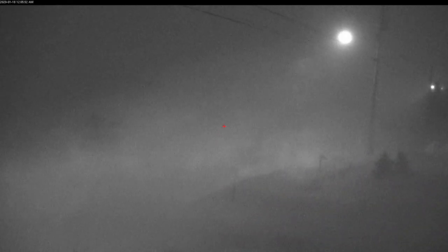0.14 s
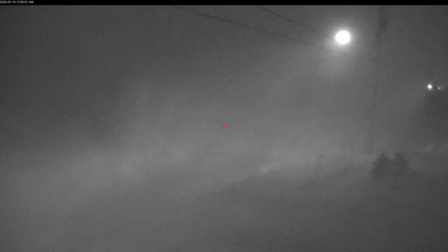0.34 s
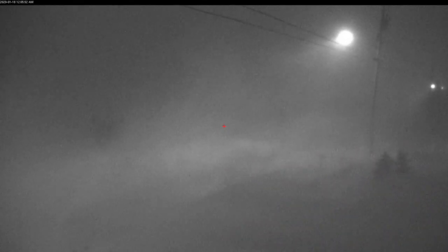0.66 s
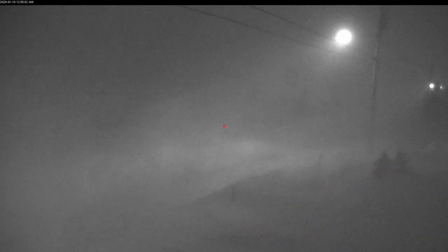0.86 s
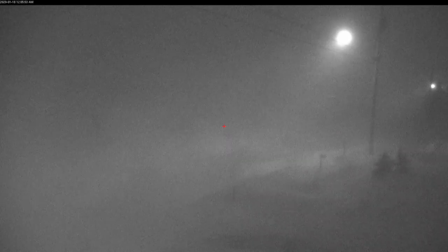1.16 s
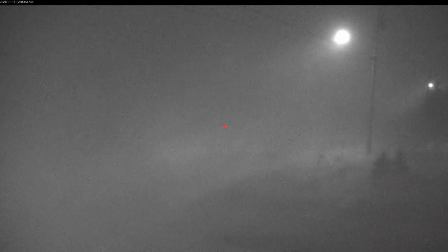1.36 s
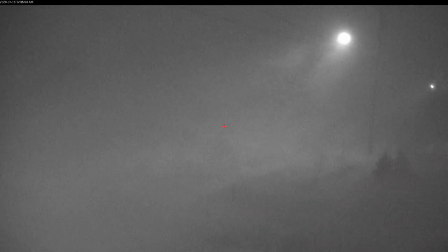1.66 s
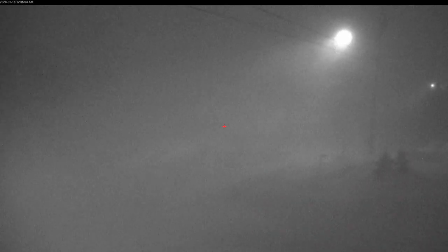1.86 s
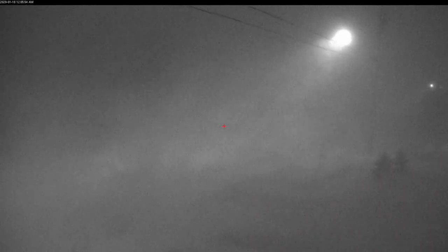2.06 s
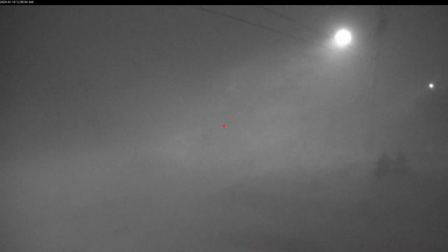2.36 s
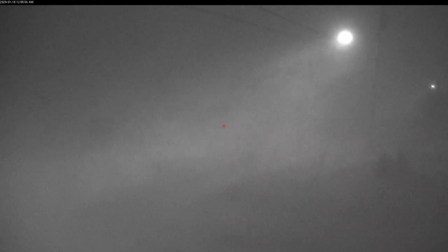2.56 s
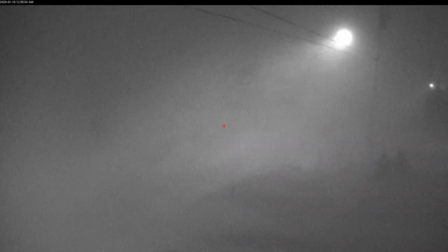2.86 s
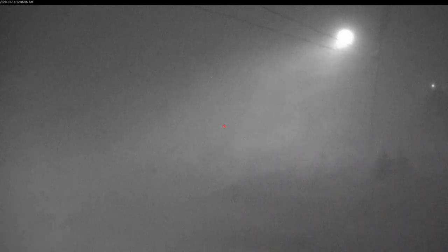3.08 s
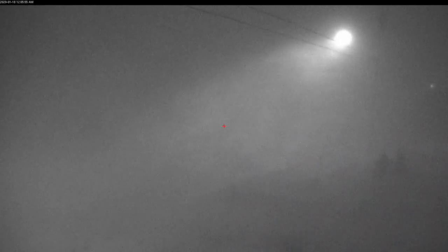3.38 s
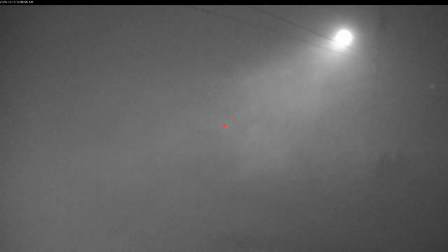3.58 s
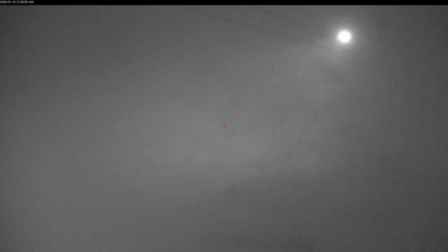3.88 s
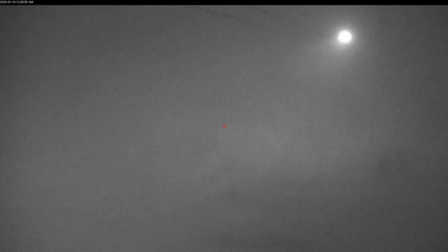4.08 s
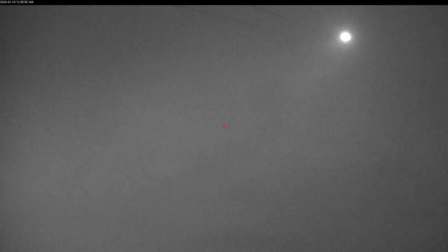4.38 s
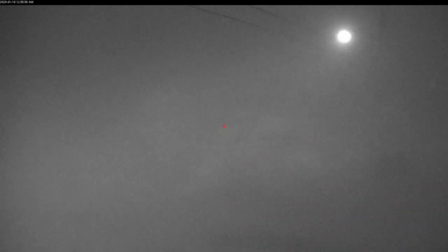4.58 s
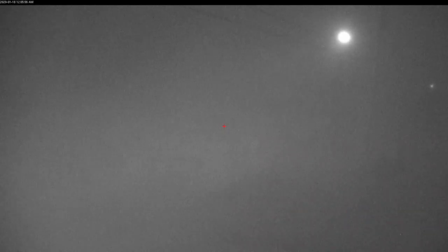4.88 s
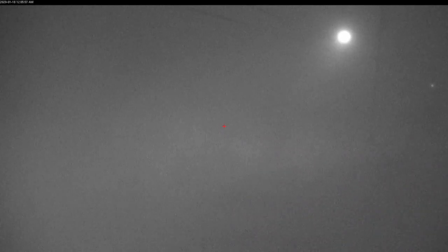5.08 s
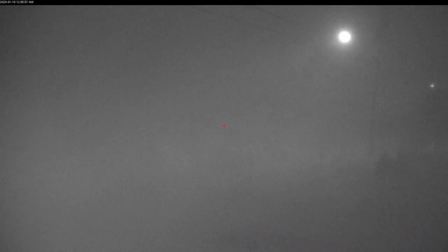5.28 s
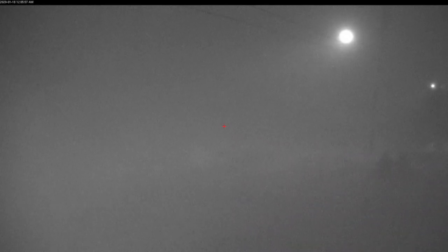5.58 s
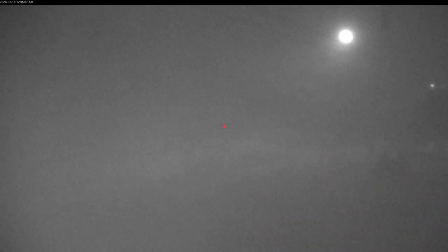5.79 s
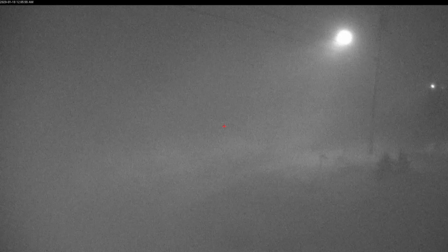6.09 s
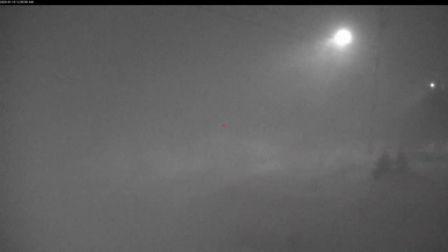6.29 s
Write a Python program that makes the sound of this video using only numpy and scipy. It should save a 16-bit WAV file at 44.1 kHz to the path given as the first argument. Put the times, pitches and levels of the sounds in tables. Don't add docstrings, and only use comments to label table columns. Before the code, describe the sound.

Close, nearly mono wind noise overloads a sheltered outdoor microphone with soft, heavy bass thumps. Panels drum and resonate in the low middle range as gusts shake them. Over this, fine snow sprays past in dry, flickering hisses, with scattered crisp ice clicks, tiny high pings and occasional loose rattles. The pellets grow more frequent in the second half, and the storm is still strengthening when it stops.

```python
import sys
import numpy as np
from scipy import signal
from scipy.fft import rfft, irfft, next_fast_len
from scipy.io import wavfile
from scipy.ndimage import uniform_filter1d

SR = 44100
rng = np.random.default_rng(int(sys.argv[2]) if len(sys.argv) > 2 else 0)


def makeup_ratio(level_db):
    decades = np.asarray(level_db, float) / 20
    return 10 ** decades


def wav_out(sig):
    wavfile.write(sys.argv[1], SR, np.round(np.clip(np.atleast_2d(sig).T, -1, 1) * 32767).astype(np.int16))


N = 284004
SIZE = next_fast_len(N + SR)
HZ = np.maximum(np.arange(SIZE // 2 + 1) * SR / SIZE, 0.1)


def unit(x):
    return x / np.sqrt(np.mean(x ** 2))


def band(x, lo_hz, hi_hz):
    return signal.sosfilt(signal.butter(2, [lo_hz, hi_hz], "band", fs=SR, output="sos"), x)


def walk(rate):
    hold = max(int(SR / rate), 1)
    steps = rng.standard_normal(4000)[np.arange(N) // hold % 4000]
    return unit(uniform_filter1d(uniform_filter1d(steps, hold), hold))


def swells(times, heights, lengths):
    out, t = np.zeros(N), np.arange(N) / SR
    for s, height, length in zip(times, heights, lengths):
        part = slice(max(int((s - 2 * length) * SR), 0), int((s + 2 * length) * SR))
        out[part] += height * 0.5 ** np.square(2 * (t[part] - s) / length)
    return out


# centre in Hz, width in Hz, lift in dB.
RESONANCES = [(56, 7.7, -6), (120, 20, 5), (166.4, 17, 7.5), (239.4, 8.6, 5.5), (284, 34, 5.5),
              (326.3, 25, 6.5), (412, 40.7, 11), (521.5, 11, 9.5), (638, 46, 2.5), (928, 45, 5),
              (1288, 24, -7.5), (1918, 61, 6.5), (3330, 114, 4), (5130, 300, 4), (12950, 840, 4)]


def housing_gain():
    lifts_db = [db / (1 + np.square(2 * (HZ - hz) / width)) for hz, width, db in RESONANCES]
    return makeup_ratio(sum(lifts_db))


def colour(x, points):
    hz, db = np.transpose(points)
    source_db = np.interp(np.log(HZ), np.log(hz), db, left=-200, right=-200)
    return rfft(x, SIZE) * makeup_ratio(source_db) * housing_gain()


def coloured_noise(points):
    return unit(irfft(colour(rng.standard_normal(N), points), SIZE)[:N])


def eddies(x, points, shared_db, flicker_db, rate):
    spectrum = colour(x, points)
    half_octave = 2 * np.log2(HZ)
    first, last = int(2 * np.log2(points[0][0])), int(2 * np.log2(points[-1][0])) + 1
    out = 0
    for centre in range(first, last + 1):
        share = np.cos(np.pi / 2 * np.clip(half_octave - centre, -1, 1)) ** 2
        out = out + makeup_ratio(shared_db + flicker_db * walk(rate)) * irfft(spectrum * share, SIZE)[:N]
    return unit(out)


def steady(x, smooth_s, share):
    envelope = np.abs(signal.hilbert(x, SIZE)[:N])
    swell = uniform_filter1d(envelope, int(smooth_s * SR)) + 0.074
    return unit(x / swell ** share)


# time in seconds, wind force in dB, snow load in dB.
STORM_COURSE = [(0.0, 0.5, 1.5), (0.9, -0.5, -1.5), (1.55, -2, -3), (2.2, 3.5, -5), (2.65, -0.5, -2),
                (3.1, 2, 4), (3.7, 1, -1), (4.4, 4.5, 5), (4.75, 3, 4), (5.3, 4, 3), (5.7, 5.5, 5.5),
                (6.1, 7.5, 5.5), (6.44, 7.5, 7)]


def storm():
    s, force_db, load_db = np.transpose(STORM_COURSE)
    t = np.arange(N) / SR
    return np.interp(t, s, force_db), np.interp(t, s, load_db)


# frequency in Hz, density in dB per Hz.
SURGE_COLOUR = [(1, -2.5), (3, 0.5), (6, 3.5), (8.5, -0.5), (12, 4.5), (19, -1), (23, -15.5), (27, -60),
                (40, -89)]
# time in seconds, peak in dB, length in seconds.
SURGE_EVENTS = [(0.002, -19.5, 0.056), (0.193, -16.5, 0.046), (0.284, -12, 0.035), (0.544, -26.5, 0.16),
                (0.697, -17, 0.098), (0.89, -15, 0.015), (1.16, -13.5, 0.24), (1.406, -21.5, 0.048),
                (1.506, -9, 0.045), (1.759, -11, 0.08), (1.904, -18.5, 0.064), (2.137, -14, 0.16),
                (2.455, -7, 0.23), (2.73, -2.5, 0.052), (2.82, -15, 0.11), (2.98, -18, 0.098),
                (3.116, -17.5, 0.19), (3.311, -11.5, 0.068), (3.55, -15, 0.17), (3.977, -10.5, 0.044),
                (4.23, -9.5, 0.052), (4.536, -10, 0.13), (4.722, -18, 0.12), (4.852, -10, 0.087),
                (5.076, -13, 0.18), (5.268, -9.5, 0.069), (5.489, -14.5, 0.043), (5.643, -7.5, 0.048),
                (5.923, -13, 0.39), (6.288, -6.5, 0.19)]


def surges(force_db):
    lull_db, surge_top_hz = -26, 29.5
    s, peak_db, length = np.transpose(SURGE_EVENTS)
    gain = makeup_ratio(lull_db + force_db) + swells(s, makeup_ratio(peak_db), length)
    surge = gain * steady(coloured_noise(SURGE_COLOUR), smooth_s=0.053, share=0.75)
    return signal.sosfiltfilt(signal.butter(2, surge_top_hz, fs=SR, output="sos"), surge)


# frequency in Hz, density in dB per Hz.
BUFFET_COLOUR = [(16, -70), (24, -6), (32, -1), (44, -4.5), (60, -7), (68, -14.5), (78, -25.5), (100, -61)]
# time in seconds, peak in dB, length in seconds.
BUFFET_EVENTS = [(0.011, -23, 0.032), (0.14, -43, 0.037), (0.24, -45, 0.021), (0.34, -37, 0.063),
                 (0.39, -37.0, 0.026), (0.517, -44, 0.066), (0.702, -31, 0.062), (0.787, -46, 0.05),
                 (0.985, -37, 0.057), (1.118, -27, 0.054), (1.26, -35, 0.11), (1.437, -36, 0.18),
                 (1.547, -43, 0.021), (1.592, -33.5, 0.03), (1.73, -37, 0.082), (1.863, -31, 0.065),
                 (2.008, -32, 0.065), (2.135, -31.5, 0.083), (2.317, -26, 0.048), (2.35, -28, 0.038),
                 (2.46, -36, 0.036), (2.556, -28.5, 0.072), (2.622, -30, 0.026), (2.8, -30, 0.12),
                 (2.932, -29, 0.057), (3.006, -44, 0.041), (3.09, -32, 0.037), (3.166, -32, 0.043),
                 (3.327, -36, 0.027), (3.389, -36, 0.096), (3.47, -25, 0.022), (3.52, -30.0, 0.049),
                 (3.635, -36, 0.052), (3.726, -34, 0.047), (3.785, -36, 0.026), (3.87, -26.5, 0.057),
                 (4.035, -27, 0.12), (4.127, -28, 0.023), (4.25, -23, 0.029), (4.324, -33, 0.037),
                 (4.39, -30.0, 0.061), (4.625, -38, 0.052), (4.712, -29, 0.03), (4.802, -19.5, 0.055),
                 (4.917, -23, 0.025), (5.035, -23, 0.041), (5.102, -27, 0.078), (5.213, -31, 0.15),
                 (5.383, -30, 0.14), (5.47, -33, 0.032), (5.6, -25, 0.033), (5.617, -33, 0.078),
                 (5.743, -36, 0.023), (5.838, -31, 0.047), (5.983, -29, 0.12), (6.137, -30, 0.043),
                 (6.28, -30, 0.076), (6.375, -34, 0.046)]


def buffeting(force_db):
    lull_db, damping_db = -36.5, -2
    s, peak_db, length = np.transpose(BUFFET_EVENTS)
    gain = makeup_ratio(lull_db + force_db) + swells(s, makeup_ratio(peak_db), length)
    return makeup_ratio(damping_db) * gain * steady(coloured_noise(BUFFET_COLOUR), smooth_s=0.048, share=0.77)


# frequency in Hz, density in dB per Hz.
ROAR_COLOUR = [(50, -56), (70, -15), (100, 1), (200, -6.5), (320, -9), (430, -15.5), (490, -22.5),
               (620, -34.5)]
# time in seconds, lift in dB, length in seconds.
LARGE_PANEL_THUDS = [(0.155, -4, 0.033), (0.197, -5, 0.03), (0.254, -1, 0.03), (0.35, 3, 0.049),
                     (0.598, 3.5, 0.066), (0.788, 3, 0.047), (0.877, 5, 0.027), (0.945, 0.5, 0.14),
                     (1.098, 3, 0.026), (1.15, 9.0, 0.14), (1.285, 6, 0.044), (1.404, -2.5, 0.047),
                     (1.504, 5.5, 0.074), (1.656, 3.5, 0.037), (1.744, 4.5, 0.066), (1.898, 4.5, 0.071),
                     (2.036, 7.5, 0.071), (2.16, 8, 0.043), (2.227, 4.5, 0.039), (2.33, 9, 0.032),
                     (2.527, 9.5, 0.13), (2.754, 6, 0.03), (2.81, 9, 0.028), (2.866, 1, 0.04),
                     (2.947, 5, 0.075), (3.018, 4, 0.033), (3.102, 5, 0.033), (3.24, 5.5, 0.065),
                     (3.348, 2, 0.053), (3.46, -1, 0.023), (3.53, 1.5, 0.048), (3.749, 3, 0.055),
                     (3.93, 11, 0.045), (3.98, 10, 0.032), (4.043, 10, 0.044), (4.127, 5, 0.027),
                     (4.285, 3.5, 0.04), (4.375, 5.0, 0.027), (4.504, 3, 0.044), (4.676, 6.5, 0.054),
                     (4.737, -4, 0.03), (4.816, 8, 0.059), (4.932, 1.5, 0.049), (5.032, 4, 0.034),
                     (5.116, 4, 0.056), (5.264, 1, 0.057), (5.49, 4, 0.047), (5.556, 3.5, 0.12),
                     (5.641, 5, 0.03), (5.896, 1, 0.056), (5.97, 4, 0.062), (6.055, 4.5, 0.052),
                     (6.122, -5, 0.03), (6.19, 8, 0.068), (6.316, 7.5, 0.03)]
# time in seconds, lift in dB, length in seconds.
SMALL_PANEL_DRUMS = [(0.2, 0.5, 0.065), (0.356, 2.5, 0.08), (0.445, 4, 0.03), (0.502, 5.5, 0.025),
                     (0.565, 6, 0.045), (0.647, 2, 0.054), (0.749, -1, 0.055), (0.85, -2, 0.034),
                     (0.95, 4, 0.039), (1.108, 7.5, 0.089), (1.215, 3, 0.044), (1.248, 7, 0.03),
                     (1.365, 4, 0.049), (1.428, 3, 0.03), (1.488, 2, 0.077), (1.584, 2.5, 0.03),
                     (1.644, 7, 0.069), (1.744, 3, 0.034), (1.852, 3.0, 0.035), (1.912, 8, 0.03),
                     (2.01, 2, 0.15), (2.181, 1, 0.029), (2.338, 5, 0.047), (2.523, 5.5, 0.062),
                     (2.66, 3, 0.03), (2.732, 4.5, 0.052), (2.964, 5, 0.19), (3.098, 8, 0.024),
                     (3.199, 6.5, 0.064), (3.26, 3.5, 0.03), (3.4, 5, 0.079), (3.592, 1, 0.112),
                     (3.713, 5, 0.063), (3.83, 5.5, 0.077), (3.92, 1.5, 0.046), (4.074, 5, 0.087),
                     (4.174, 3, 0.022), (4.22, 5.5, 0.022), (4.274, 3, 0.04), (4.36, 4.5, 0.03),
                     (4.564, 2, 0.03), (4.638, 0, 0.03), (4.735, 3, 0.037), (4.842, 0, 0.036),
                     (4.985, 6, 0.18), (5.153, 5, 0.078), (5.454, 6, 0.039), (5.606, 2.5, 0.072),
                     (5.86, 3, 0.024), (5.92, 5, 0.03), (5.979, 7.5, 0.023), (6.032, 3.5, 0.032),
                     (6.224, 3.5, 0.164), (6.29, -12, 0.024), (6.373, 1.5, 0.051)]


def roar(flutter):
    split_hz = 196.5
    noise = eddies(rng.standard_normal(N), ROAR_COLOUR, 0.34 * flutter, 0.53, rate=24)
    large = signal.sosfiltfilt(signal.butter(4, split_hz, fs=SR, output="sos"), noise)
    small = noise - large
    thuds_db = swells(*np.transpose(LARGE_PANEL_THUDS)) - 3.0
    drums_db = swells(*np.transpose(SMALL_PANEL_DRUMS)) - 5.0
    thuds = makeup_ratio(thuds_db) * steady(large, smooth_s=0.036, share=1.0)
    drums = makeup_ratio(drums_db) * steady(small, smooth_s=0.033, share=0.49)
    return thuds + drums


# frequency in Hz, density in dB per Hz.
RUSH_COLOUR = [(380, -18), (460, -3.5), (560, -2.5), (800, -5.5), (1250, -4), (1600, -11), (2050, -12.5),
               (2400, -19.5), (3600, -20.5), (4600, -18.5)]


def rush(flutter):
    noise = eddies(rng.standard_normal(N), RUSH_COLOUR, 0.65 * flutter, 0.55, rate=22)
    return steady(noise, smooth_s=0.17, share=0.21)


# time in seconds, lift in dB, length in seconds, extra lift of the panels in dB.
GUST_EVENTS = [(0.17, 4.5, 0.066, 5), (0.36, 0.5, 0.087, -2), (0.57, 1, 0.098, -3), (1.143, 6.5, 0.11, 0),
               (1.293, 3.5, 0.16, 2), (1.492, 3, 0.11, 4), (1.757, 2, 0.11, 7), (1.878, 6, 0.052, 7),
               (2.033, 3, 0.098, 4), (2.357, 2.5, 0.13, 12), (2.506, 4.5, 0.081, 9), (2.81, 4, 0.24, 8.5),
               (2.935, 6, 0.17, 4), (3.758, 0, 0.17, 5), (3.947, 8.5, 0.18, 1), (4.147, 4.5, 0.23, 10),
               (4.57, 3.5, 0.17, 4), (4.67, -1.5, 0.046, 3), (4.873, 4.5, 0.11, 7), (4.992, 2.5, 0.069, 3),
               (5.152, 3, 0.19, 4.5), (5.463, 3, 0.1, -1), (5.58, 1.5, 0.1, 5), (5.872, 4, 0.14, 15),
               (5.96, 2.5, 0.11, 1.5), (6.222, 3.5, 0.12, 4)]


def wind(force_db):
    s, lift_db, length, panel_db = np.transpose(GUST_EVENTS)
    gust_db = swells(s, lift_db, length)
    roar_db = -45.5 + 0.64 * force_db + 0.083 * gust_db + 0.29 * swells(s, panel_db, length)
    rush_db = -55.5 + force_db + gust_db
    slow = surges(force_db) + buffeting(force_db)
    flutter = walk(14)
    return slow + makeup_ratio(roar_db) * roar(flutter) + makeup_ratio(rush_db) * rush(flutter)


# frequency in Hz, density in dB per Hz.
HISS_COLOUR = [(1900, -53), (2400, -11), (3200, -3), (3800, -7.5), (4500, -0.5), (5400, -3), (6500, -6),
               (7500, -13.5), (9000, -45)]
# frequency in Hz, density in dB per Hz.
SPRAY_COLOUR = [(6000, -18.5), (7200, -5), (8500, -1), (11000, -1), (13000, -2), (14000, -5), (15500, -8),
                (17000, -2.5), (21000, -27)]
# time in seconds, lift in dB, length in seconds, fineness in dB.
SNOW_SHEETS = [(0.122, 1, 0.27, 3), (0.79, 4, 0.24, 2.5), (0.953, 1.5, 0.042, 3), (1.05, 0.5, 0.08, -2),
               (1.14, 3, 0.064, -0.5), (1.2, 2.5, 0.044, -1), (1.773, 5.5, 0.05, -5),
               (1.89, 7.5, 0.087, -3), (2.045, 6, 0.13, -1.5), (2.193, 6.5, 0.12, -2.5),
               (2.37, 6, 0.081, -1), (2.498, 7, 0.18, 3.5), (2.73, 5, 0.15, -0.5), (2.92, 5, 0.19, 1),
               (3.076, 4, 0.23, 2), (3.358, 1, 0.16, 3.5), (3.614, 6, 0.11, 3), (3.786, 4.5, 0.099, -1),
               (3.958, 6.5, 0.14, 0.5), (4.157, 8, 0.23, 1), (4.6, 3.5, 0.19, 0), (4.908, 7, 0.13, 2.5),
               (5.026, 4, 0.077, 1), (5.18, 5, 0.21, 1.5), (5.5, 1.5, 0.07, 2.5), (5.645, 3.5, 0.11, 1),
               (5.928, 7, 0.29, 2), (6.24, 5, 0.17, 2.5), (6.41, 0.5, 0.066, 2)]


def snow(load_db):
    s, lift_db, length, fine_db = np.transpose(SNOW_SHEETS)
    load_db = load_db + swells(s, lift_db, length)
    hiss_db = -62 + load_db
    spray_db = -64.5 + 1.05 * load_db + swells(s, fine_db, length)
    clumps_per_s, scatter_s = 120, 0.0025
    arrivals = rng.random(N) < clumps_per_s / SR
    clumps = arrivals * makeup_ratio(np.minimum(3 * rng.exponential(size=N), 11))
    scatter = signal.lfilter([1], [1, -np.exp(-1 / (scatter_s * SR))], clumps)
    impact = rng.standard_normal(N) * (1 + makeup_ratio(-12.5) * scatter)
    sheets = walk(24.9) + 0.16 * walk(60)
    hiss = eddies(impact, HISS_COLOUR, 0.89 * sheets, 0.61, rate=25)
    spray = eddies(impact, SPRAY_COLOUR, 0.48 * sheets, 0.92, rate=19)
    return makeup_ratio(hiss_db) * hiss + makeup_ratio(spray_db) * spray


# time in seconds, peak in dB, then dull part and cover ring in dB against the bright part.
ICE_PELLETS = [(0.1332, -41, -2, 14), (0.3252, -40, -7, 6), (0.8087, -38.5, 2, 4), (0.9383, -40.5, 1, 4),
               (2.4668, -41, 16, 4), (1.8692, -29, 8, 15), (2.3271, -38, 10, -3), (2.3317, -32.5, 6, 3),
               (2.8889, -31.5, 5, 5), (3.2186, -36.5, 14, 18), (3.3463, -40, -11, -2), (3.475, -45, -4, 6),
               (3.5186, -34, -13, -16), (3.5778, -40, -6, 0), (3.6331, -39, -7, 11), (3.7858, -39, -6, -3),
               (3.8092, -37, 6, 6), (4.0557, -33.5, 19, -4), (4.12, -33, -2, 3), (4.4806, -30, -5, -1),
               (4.5808, -29, -14, -2), (4.6608, -40.5, -4, -8), (4.8524, -31, -8, 8),
               (5.0155, -26, -12, -6), (5.1467, -33, -4, -2), (5.3113, -39, -18, -14),
               (5.455, -33.5, -5, -8), (5.6022, -41, -2, -6), (5.6311, -36, -11, -2), (5.659, -36, 2, 1)]
# time in seconds, peak in dB.
ICE_GRAINS = [
    (1.221, -43),
    (1.256, -46),
    (1.857, -45),
    (2.2653, -47),
    (2.358, -41),
    (2.5546, -44),
    (3.4032, -46),
    (3.8317, -42),
    (1.9874, -48),
]


def pellets():
    grain_dull_db, grain_ring_db = -7, 1
    hits = list(ICE_PELLETS) + [(s, db, grain_dull_db, grain_ring_db) for s, db in ICE_GRAINS]
    out, t = np.zeros(N + 2048), np.arange(2048) / SR
    for (s, peak_db, dull_db, ring_db), noise in zip(hits, rng.standard_normal((len(hits), len(t)))):
        crack = (t == 0) + makeup_ratio(-5) * noise * np.exp(-t / 0.00025)
        scatter_db = -8.5 - 0.92 * (peak_db + 31.0)
        burst = crack + makeup_ratio(scatter_db) * noise * np.exp(-t / 0.0033)
        dull = makeup_ratio(dull_db + 7.5) * band(burst, 1500, 6200)
        ring = makeup_ratio(ring_db + 2.5) * band(burst, 5600, 10600)
        bright = makeup_ratio(-0.5) * band(band(burst, 9600, 16500), 9600, 16500)
        tick = dull - ring + bright
        start = int((s + 0.00067) * SR)
        out[start:start + len(t)] += makeup_ratio(peak_db) * tick / np.max(np.abs(tick))
    return out[:N]


# time in seconds, push in dB, push length in ms, rattle in dB, rattle decay in ms.
LOOSE_PART_KNOCKS = [(1.885, -50, 1.2, -53, 7.1), (2.3278, -17, 1.63, -38, 11),
                     (2.469, -34, 1.23, -34.5, 5.1), (2.515, -26, 1.55, -41, 5.7),
                     (2.937, -35, 1.1, -31, 3), (2.947, -23, 1.9, -53, 5.3), (3.779, -43, 1.3, -44, 6.8),
                     (3.922, -18.5, 3.7, -43, 5.6), (4.058, -48, 1.15, -34.5, 5.8),
                     (4.152, -38, 1.2, -37, 6.3), (5.143, -34, 0.83, -47, 6.5),
                     (5.839, -48, 1.2, -38.5, 20), (5.903, -20.5, 3.2, -38, 4.5),
                     (6.275, -21, 1.9, -41, 4.6), (2.383, -35, 1.1, -44, 3.7), (2.849, -47, 1.54, -39, 6),
                     (3.893, -42, 1.5, -41, 7.4), (2.334, -36, 2.6, -37.5, 28), (3.93, -37, 3.9, -40, 27),
                     (5.625, -39, 1.2, -44, 6)]


def knocks():
    cycles_per_push = 1.15
    blow, t = np.zeros(N + 4096), np.arange(4096) / SR
    noises = rng.standard_normal((len(LOOSE_PART_KNOCKS), len(t)))
    for (s, push_db, push_ms, rattle_db, decay_ms), noise in zip(LOOSE_PART_KNOCKS, noises):
        push = np.sin(np.pi * np.clip(t / (push_ms / 1000), 0, 1)) ** 2
        hz = 1000 * cycles_per_push / push_ms
        rattle = unit(band(noise, hz / 1.9, hz * 1.41))
        rattle = rattle * np.exp(-t / (decay_ms / 1000)) * (1 - np.exp(-t / 0.0018))
        draw = np.sin(np.pi * np.clip(t / 0.0084, 0, 1)) ** 2
        early, start = int((s - 0.007) * SR), int(s * SR)
        blow[early:early + len(t)] -= makeup_ratio(push_db - 9.0) * draw
        blow[start:start + len(t)] += makeup_ratio(push_db) * push + makeup_ratio(rattle_db + 1.5) * rattle
    blow = signal.sosfilt(signal.butter(1, 90, "high", fs=SR, output="sos"), blow[:N])
    ring = sum(signal.lfilter(*signal.iirpeak(hz, hz / width, SR), blow) for hz, width, _ in RESONANCES[1:12])
    return blow + 0.14 * ring


# time in seconds, peak in dB, pitch in Hz.
ICE_CHIPS = [(1.1209, -52, 12500), (2.0273, -55, 12500), (2.3191, -52, 12000), (2.322, -48, 5300),
             (3.0131, -37, 13200), (3.322, -46, 11600), (3.356, -42, 8500), (3.476, -39, 5100),
             (3.547, -48, 12000), (3.597, -46, 12000), (3.6531, -42, 13100), (3.862, -43, 5030),
             (3.893, -40, 9000), (4.793, -55, 8000), (4.895, -41, 9000), (4.985, -39, 5000),
             (5.056, -45, 10000), (5.15, -31, 4600), (5.3852, -41, 14200), (5.462, -38, 4400),
             (5.661, -31, 4660), (5.7159, -42, 12600), (5.752, -43, 12700), (0.86, -48, 8000),
             (1.14, -45, 4500), (2.8889, -37, 12500), (3.432, -47, 13000), (4.5814, -30, 12600),
             (5.0155, -26, 12900)]


def chips():
    t60_s, spread, rise_s = 0.008, 0.09, 0.00015
    out, t = np.zeros(N + 2048), np.arange(2048) / SR
    decay = np.exp(-np.log(1000) * t / t60_s) * (1 - np.exp(-t / rise_s))
    for (s, peak_db, hz), chance in zip(ICE_CHIPS, rng.standard_normal((len(ICE_CHIPS), 3, 1))):
        partials = np.sin(2 * np.pi * hz * (1 + spread * chance) * t)
        start = int(s * SR)
        out[start:start + len(t)] += makeup_ratio(peak_db) * partials.mean(axis=0) * decay
    return out[:N]


def scene():
    force_db, load_db = storm()
    sound = wind(force_db) + snow(load_db) + pellets() + knocks() + chips()
    return np.array([sound, sound])


def low_pass(x):
    return signal.sosfilt(signal.butter(12, 15900, fs=SR, output="sos"), x)


def record(dry):
    bass = signal.sosfilt(signal.butter(1, 130, fs=SR, output="sos"), dry[0])
    uneven = dry + makeup_ratio(-36) * np.array([bass, -bass])
    wet = np.tanh(0.61 * uneven) / 0.6
    top_cut = signal.ellip(8, 0.2, 35, 15800, fs=SR, output="sos")
    mix = signal.sosfiltfilt(top_cut, wet - wet.mean())
    return low_pass(mix)


dry = scene()
out = record(dry)
wav_out(out)
```